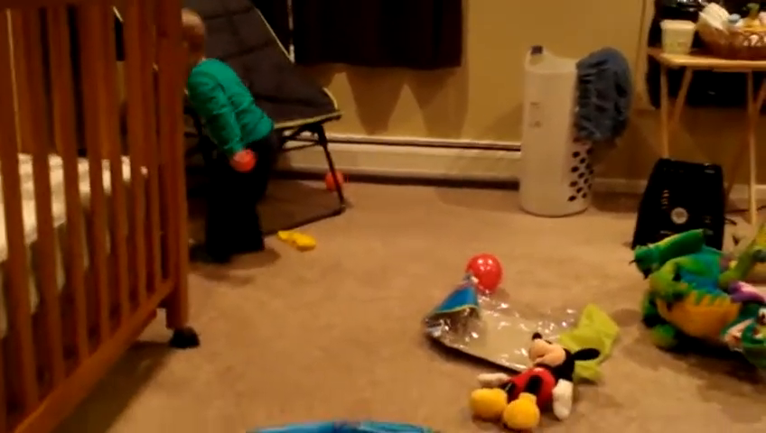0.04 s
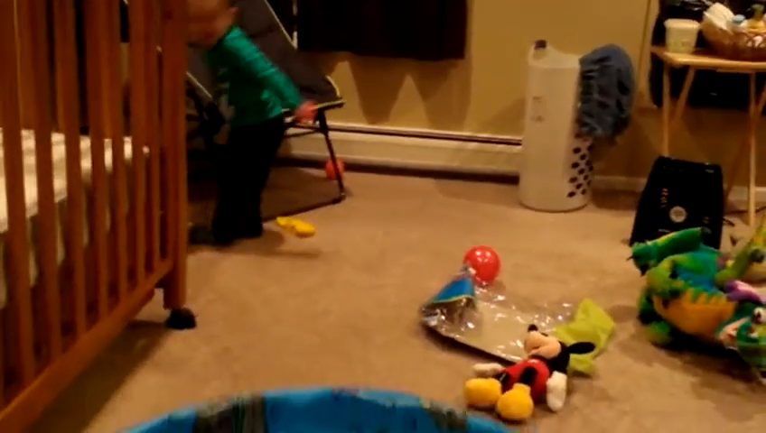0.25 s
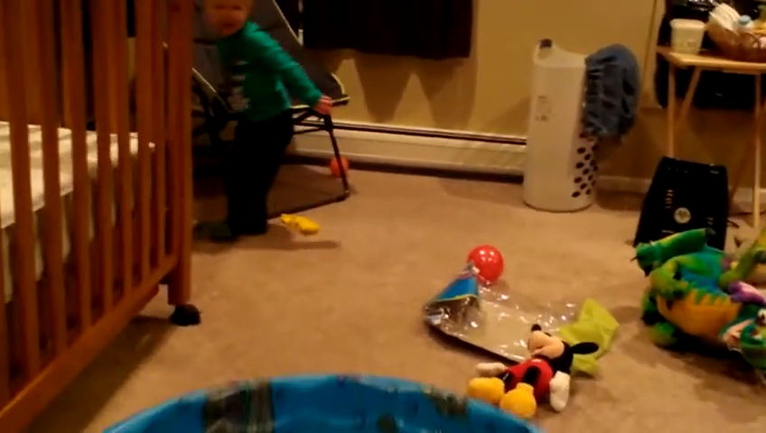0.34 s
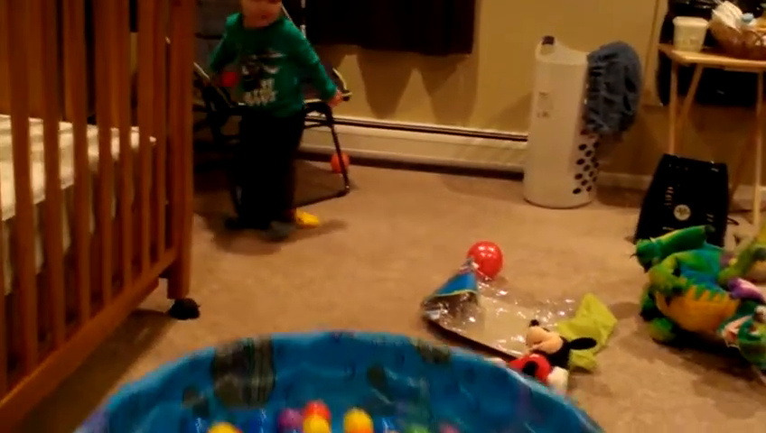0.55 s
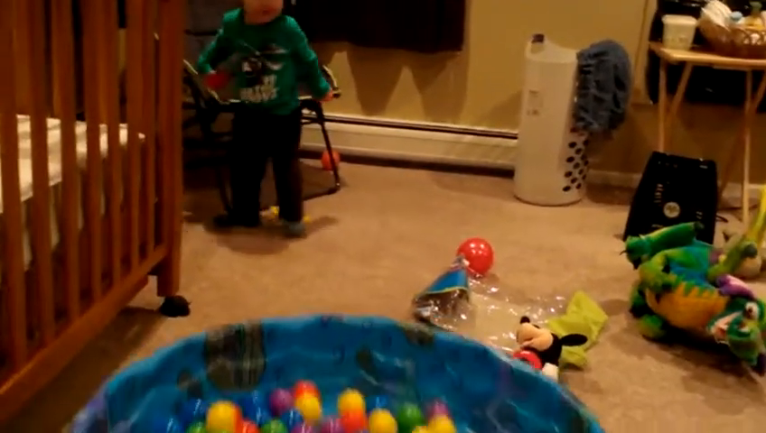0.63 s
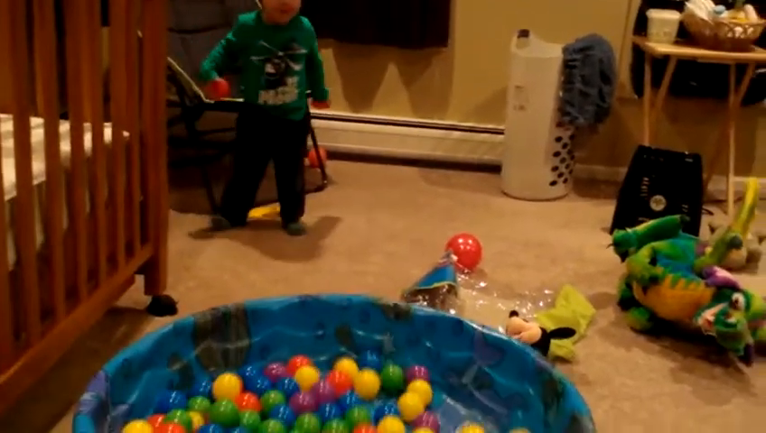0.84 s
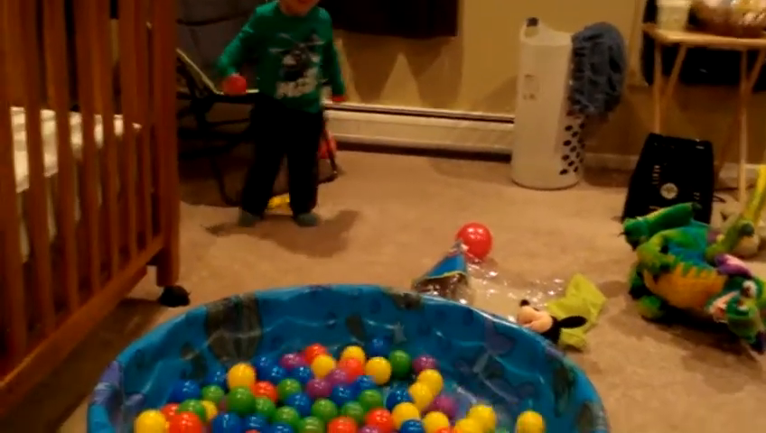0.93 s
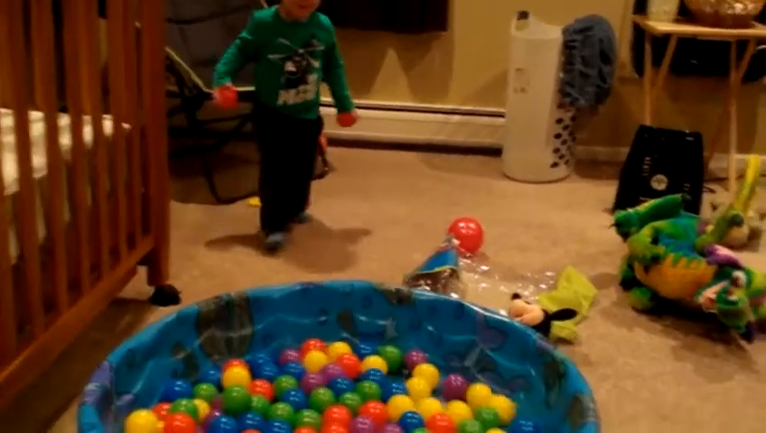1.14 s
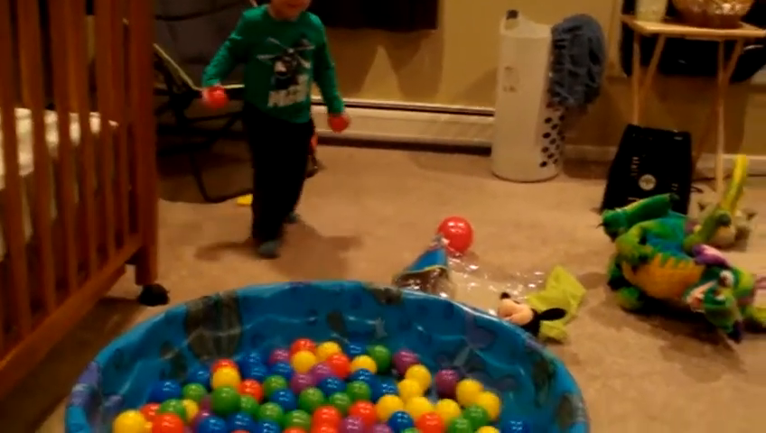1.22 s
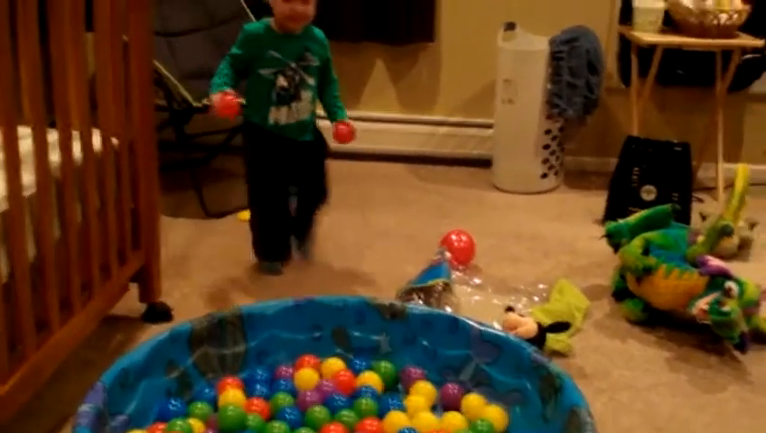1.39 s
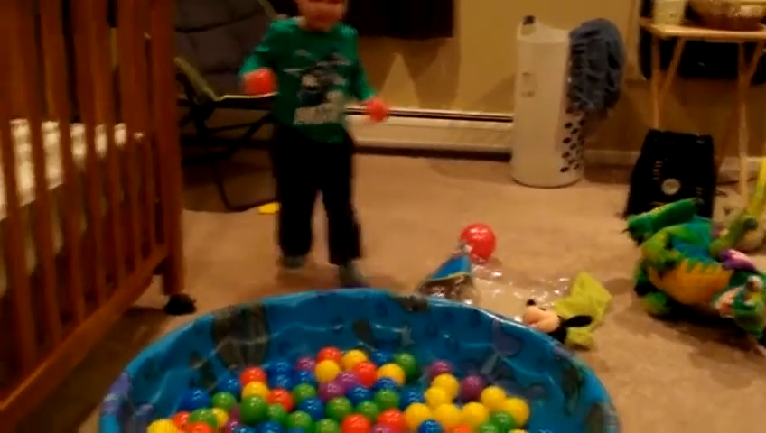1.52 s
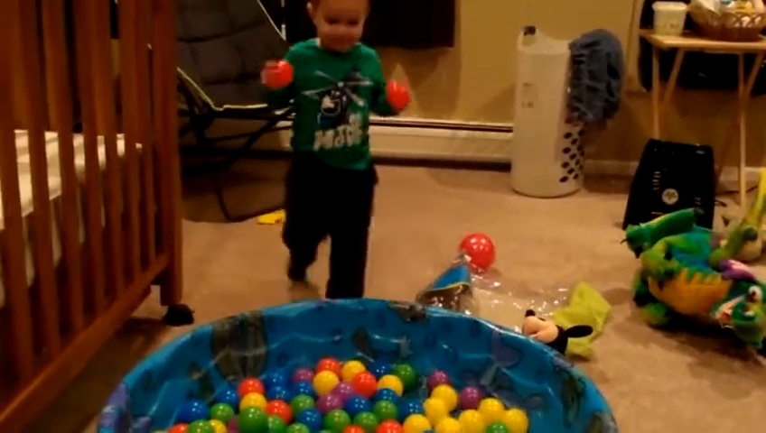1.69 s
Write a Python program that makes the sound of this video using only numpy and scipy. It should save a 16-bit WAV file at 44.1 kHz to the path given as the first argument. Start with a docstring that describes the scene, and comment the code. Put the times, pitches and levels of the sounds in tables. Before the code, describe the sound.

Close by in a small carpeted room, plastic play balls are stirred twice, clattering together and drumming dully on a plastic pool. The last balls click to rest, and faint footsteps follow over low room tone.

```python
"""Hollow plastic play balls stirred in a thin plastic pool: two surges, then a few stragglers settle.
The balls bump the pool, which drums on its low modes; they clack on each other, and their skins
scuff in a fine hiss. The place is a small carpeted room, with room tone, an uneven low rumble and
soft footfalls near the end. The stereo microphone is close enough for direct sound to lead the room."""
import sys
import numpy as np
from scipy import signal
from scipy.fft import rfft, irfft, next_fast_len
from scipy.io import wavfile

SR = 44100
rng = np.random.default_rng(int(sys.argv[2]) if len(sys.argv) > 2 else 0)


def digitize_waveform(pressure):
    """Quantize a signal to 16-bit integers and store it at the path in sys.argv[1].

    Rows of a 2-D input are taken as channels; values are limited to [-1, 1].
    """
    field = np.atleast_2d(pressure).T
    bounded = np.clip(field, -1, 1)
    quanta = np.round(bounded * 32767).astype(np.int16)
    wavfile.write(sys.argv[1], SR, quanta)


N = 77175

# How hard the heap moves. Each row: time in seconds, drumming of the pool in dB, clacking and
# scuffing in dB against the drumming (before their trims), pitch the pool favours in Hz.
STIRRING = [(0.205, -36, -18, -37, 276), (0.213, -43, -14, -19, 289), (0.243, -40, -3.5, -4.5, 251),
            (0.285, -33, -3.5, -13.5, 261), (0.303, -39, -4.5, -8.5, 282), (0.351, -31, -2.5, -14.5, 342),
            (0.419, -31, -10.5, -17, 262), (0.487, -35.5, -6.5, -14, 300), (0.535, -38.5, -2.5, -7, 270),
            (0.599, -36.5, -9, -10.5, 323), (0.621, -36.5, -5, -7.5, 298), (0.665, -39, -6.5, -8.5, 240),
            (0.745, -43, -8, -3.5, 280), (0.849, -36.5, -4, -12, 300), (0.871, -35.5, -3, -13, 277),
            (0.939, -34, -3, -18, 268), (0.975, -33.5, -1, -18.5, 295), (1.009, -31, -8.5, -22, 249),
            (1.035, -31, -8.5, -25, 230), (1.073, -37.5, -2.5, -18, 257), (1.095, -37.5, -5, -22.5, 308),
            (1.171, -43, 0, -12, 292), (1.207, -38, -4, -19.5, 302), (1.276, -44.5, -2, -11, 238),
            (1.281, -32, -8, -22, 217), (1.33, -43.5, 1.5, -16.5, 210), (1.369, -40, -7, -23.5, 206),
            (1.413, -47.5, -6.5, -31, 178), (1.447, -53.5, -5, -17, 190), (1.511, -51.5, -20, -24, 240),
            (1.515, -58.5, 5, -7, 264), (1.582, -49, -17, -36, 268), (1.586, -48, -1.5, -14, 273),
            (1.661, -56, -13, -33, 193), (1.679, -57, -33, -29, 191), (1.75, -54, -17, -17, 266)]
# Heavy bumps on the pool. Each row: start in seconds, strength in dB, pitch the spot favours in Hz.
HEAVY_BUMPS = [(0.2061, -32.5, 300), (0.282, -24, 360), (0.343, -26, 320), (0.388, -31, 272),
               (0.423, -35, 177), (0.452, -22, 454), (0.494, -21.5, 357), (0.616, -32, 206),
               (0.857, -19, 285), (0.884, -23.5, 282), (0.964, -13.5, 284), (1.017, -14.5, 152),
               (1.044, -21.5, 163), (1.181, -23.5, 338), (1.276, -18.5, 164), (1.307, -19.5, 152.2),
               (1.345, -28.5, 152), (1.38, -28.5, 150), (1.481, -28, 183), (1.516, -31.5, 285),
               (1.548, -32, 277), (1.628, -35, 306), (1.658, -31.5, 179)]
# Clear clacks of ball on ball. Each row: start in seconds, strength in dB, pitch in Hz,
# crack against ring in dB.
CLEAR_CLACKS = [(0.2607, -33, 1860, -3), (0.278, -33, 2070, -11), (0.3501, -30, 1460, -8),
                (0.4074, -36, 1940, 4), (0.8855, -32, 1880, -14), (0.9098, -37.5, 2170, -9),
                (1.0284, -34, 1350, 0), (1.1934, -34.5, 1740, -13), (1.2787, -33, 2900, 3),
                (1.2808, -32, 2300, -5), (1.2924, -35, 2160, -14), (1.3097, -33, 1950, -8),
                (1.328, -32, 2420, -16), (1.3642, -33, 2280, -18), (1.3928, -40, 2050, -14),
                (1.514, -52, 2810, -6), (1.5848, -49, 2090, -4), (1.602, -51, 1460, -9),
                (1.711, -55, 2900, -5)]
# Modes of the pool. Each row: frequency in Hz, relative level in dB, seconds to die by 60 dB.
POOL_MODES = [(152.4, -6.5, 0.28), (190, -5, 0.12), (224.5, -11.5, 0.22), (285, 3, 0.072),
              (327.3, -10, 0.26), (368.7, 2.5, 0.055), (427, -3.5, 0.077), (437, -7.5, 0.18),
              (472.7, -5, 0.15), (521, -12, 0.45), (690, -0.5, 0.093), (781, -7, 0.072),
              (1017, -2.5, 0.053)]
# Colour of the clacking heap. Each row: pitch of a ball in Hz, weight in dB.
HEAP_COLOUR = [(350, -34), (600, -4), (944, -1), (1030, -3.5), (1170, -6.5), (1600, -9.5), (2140, -6),
               (4000, -22.5), (6000, -29.5), (7800, -55), (13200, -120)]
# Colour of the scuffing skins. Each row: frequency in Hz, relative level in dB.
SCUFF_COLOUR = [(1470, -0.5), (2500, -0.5), (4530, -7.5), (5590, -5), (6380, -5.5), (9150, -3),
                (10100, -4.5), (10500, -15), (13600, -64), (22000, -120)]
# Colour of the room tone. Each row: frequency in Hz, relative level in dB.
ROOM_TONE_COLOUR = [(12, -52), (20, 13), (44, -48), (69, 1.5), (123, -3.5), (140, -0.5), (646, -13),
                    (1850, -15.5), (2820, -18.5), (6050, -21.5), (10800, -25), (14000, -83), (22000, -120)]
# Low rumble that comes and goes. Each row: time in seconds, level in dB.
RUMBLE_LEVEL = [(0.0, -90), (0.302, -74), (0.33, -52), (0.658, -76), (0.872, -58), (0.934, -83),
                (0.988, -49.5), (1.174, -79), (1.402, -61), (1.612, -98), (1.696, -52), (1.75, -58)]
# Footfalls on the carpet. Each row: time in seconds, peak in dB, width in seconds.
STEPS = [(1.663, -41, 0.0013), (1.698, -40.5, 0.0022), (1.736, -53, 0.0024)]
# Diffuse sound at the microphone's two ports. Each row: frequency in Hz, likeness from 0 to 1.
PORT_LIKENESS = [(60, .85), (130, .95), (260, .98), (400, .95), (600, .75), (1140, .36), (2200, .03),
                 (3000, 0)]
# Colour difference between the ports. Each row: frequency in Hz, left minus right in dB.
PORT_BALANCE = [(100, 2.5), (330, -0.8), (600, 1), (1100, -1.5), (2000, -2.3), (4000, 4), (6000, 1.9),
                (8500, -7.5), (10400, -4)]

RING_CYCLES = 22   # a ball's shell dies by 60 dB in this many cycles
TIME = np.arange(N) / SR


def amp(db):
    """dB to gain."""
    return 10 ** (np.asarray(db) / 20)


def unit_rms(x):
    """Scale to rms 1."""
    return x / np.sqrt(np.mean(x ** 2) + 1e-20)


def curves(rows):
    """Columns of a timed table, per sample."""
    times, *columns = np.transpose(rows)
    return [np.interp(TIME, times, column) for column in columns]


def at_hz(points, hz):
    """A spectrum read on a log-frequency axis."""
    freqs, values = np.transpose(points)
    return np.interp(np.log(np.maximum(hz, 1)), np.log(np.maximum(freqs, 1)), values)


def colour(x, gain_of_hz):
    """Filter by a gain per frequency."""
    n = next_fast_len(N + SR // 2)
    return irfft(rfft(x, n) * gain_of_hz(np.arange(n // 2 + 1) * SR / n), n)[..., :N]


def contacts(per_s, spread_db):
    """Two unrelated streams of random clicks, mostly small, a few large."""
    size = amp(spread_db * np.minimum(rng.exponential(1, (2, N)), 4))
    return size * rng.choice([-1, 1], (2, N)) * (rng.random((2, N)) < per_s / SR)


def ring(clicks, hz, t60):
    """A unit click sets a sine of height 1 ringing."""
    r, w = amp(-60 / (t60 * SR)), 2 * np.pi * hz / SR
    return signal.lfilter([0, np.sin(w)], [1, -2 * r * np.cos(w), r * r], clicks + 1e-18)


def diffuse(pair):
    """Sound from all around reaches the two ports alike in the bass, unlike in the treble."""
    mid = colour(pair[0], lambda hz: np.sqrt((1 + at_hz(PORT_LIKENESS, hz)) / 2))
    side = colour(pair[1], lambda hz: np.sqrt((1 - at_hz(PORT_LIKENESS, hz)) / 2))
    return np.array([mid + side, mid - side])


def background(tone_db=-57):
    """Steady room tone and an uneven rumble, all around the microphone."""
    tone = colour(rng.standard_normal((2, N)), lambda hz: amp(at_hz(ROOM_TONE_COLOUR, hz)))
    low_band = signal.butter(2, [22, 70], "band", fs=SR, output="sos")
    rumble = signal.sosfilt(low_band, rng.standard_normal((2, N)))
    rumble_db, = curves(RUMBLE_LEVEL)
    return amp(tone_db) * unit_rms(diffuse(tone)) + amp(rumble_db) * unit_rms(diffuse(rumble))


def room(x, t60=0.22, build_s=0.0085):
    """Dense reflections build up and die quickly in the small carpeted room."""
    tail = diffuse(rng.standard_normal((2, N))) * amp(-60 * TIME / t60) * np.clip(TIME / build_s, 0, 1)
    tail = tail[:, :SR // 2] / np.sqrt(np.sum(tail ** 2) / 2)
    return signal.fftconvolve(x[None], tail, axes=1)[:, :N]


def footfalls():
    """Each soft step on the carpet reaches the microphone as one smooth dip of pressure."""
    return sum(-amp(db) * np.exp(-((TIME - s) / width) ** 2) for s, db, width in STEPS)


def scuffing(scuff_db, trim_db=4.5):
    """Very fine ticks of skin on skin, from all over the heap."""
    ticks = colour(contacts(per_s=9900, spread_db=2.5), lambda hz: amp(at_hz(SCUFF_COLOUR, hz)))
    return amp(scuff_db + trim_db) * unit_rms(diffuse(ticks))


def heap_clatter(level):
    """Dense contacts all over the heap, each dealt to a ball that rings at its own pitch."""
    pitches = np.geomspace(600, 6000, 40)
    dealt = rng.integers(0, len(pitches), (2, N))
    touches = contacts(per_s=8000, spread_db=2)
    shells = sum(amp(at_hz(HEAP_COLOUR, hz)) * hz * ring(touches * (dealt == k), hz, RING_CYCLES / hz)
                 for k, hz in enumerate(pitches))
    low_cut = signal.butter(2, 500, "high", fs=SR, output="sos")
    return level * unit_rms(signal.sosfilt(low_cut, shells))


def ball_clacks(upper_ratio=1.27, upper_db=-11, rise_s=0.0004, crack_t60=0.005, trim_db=-1):
    """Ball hits ball: a short, dulled crack, and the hollow shell rings on two modes."""
    out, t = np.zeros(N), TIME[:SR // 20]
    white = 2 * rng.standard_normal((len(CLEAR_CLACKS), len(t)))
    dulled = signal.lfilter(*signal.butter(2, 3600, fs=SR), white)
    for (start, db, hz, crack_db), noise in zip(CLEAR_CLACKS, dulled):
        shell = np.sin(2 * np.pi * hz * t) + amp(upper_db) * np.sin(2 * np.pi * hz * upper_ratio * t)
        envelope = (1 - np.exp(-t / rise_s)) * amp(-60 * t * hz / RING_CYCLES)
        crack = amp(crack_db - 60 * t / crack_t60) * noise
        i = int(start * SR)
        out[i:i + len(t)] += amp(db + trim_db) * (shell * envelope + crack)[:N - i]
    return out


def favour(hz, favoured_hz, db_per_octave):
    """Gain in dB of a mode: the further from the favoured pitch, the weaker."""
    return -db_per_octave * np.abs(np.log2(hz / favoured_hz))


def pool_wall(x, rise_s=0.00023, radiates_from_hz=131):
    """Soft contact rounds off the treble, and the thin wall radiates little deep bass."""
    soft = np.exp(-1 / (rise_s * SR))
    low_cut = signal.butter(6, radiates_from_hz, "high", fs=SR, output="sos")
    return signal.sosfilt(low_cut, signal.lfilter([1 - soft], [1, -soft], x))


def pool_drumming(drum_db, favoured_hz, swell_s=0.0063, bump_trim_db=-14.5):
    """Balls strike the pool's modes. Returns a shower of soft bumps and the single heavy ones."""
    starts, bump_db, spot_hz = np.transpose(HEAVY_BUMPS)
    scatter_db = rng.normal(0, 0.69, (len(starts), len(POOL_MODES)))
    touches = contacts(per_s=900, spread_db=2) * amp(drum_db)
    shower = bumps = 0
    for k, (hz, mode_db, t60) in enumerate(POOL_MODES):
        taps = touches * amp(mode_db + favour(hz, favoured_hz, db_per_octave=10.5))
        shower += ring(taps * rng.normal(1, 0.65, (2, N)), hz, t60)
        hit_db = bump_db + mode_db + scatter_db[:, k] + favour(hz, spot_hz, db_per_octave=23)
        hits = np.zeros(N)
        hits[(starts * SR).astype(int)] = amp(hit_db + bump_trim_db)
        # A brief push at the mode's own pitch makes a heavy bump swell in.
        push = ring(hits, hz, 3 * swell_s) * 7 / (swell_s * SR)
        bumps += (-1) ** k * ring(push, hz, t60)
    shower /= np.sqrt(np.mean((shower / amp(drum_db)) ** 2))
    return pool_wall(shower), pool_wall(bumps)


def scene(start_s=0.2036, rise_s=0.0067, heap_trim_db=-1, right_lag_samples=5):
    """The stirred pool as it reaches the microphone; heavy bumps and clear clacks wake the room."""
    drum_db, clatter_db, scuff_db, favoured_hz = curves(STIRRING)
    shower, bumps = pool_drumming(drum_db, favoured_hz)
    clacks = ball_clacks()
    reflections = room(amp(-10) * bumps + amp(-7) * clacks)
    moving = np.clip((TIME - start_s) / rise_s, 0, 1)
    settling = amp(-59.5 - 78 * TIME)   # the heap is still settling from an earlier nudge
    clatter = heap_clatter(moving * amp(drum_db + clatter_db + heap_trim_db) + settling)
    spread = diffuse(moving * shower + clatter) + moving * scuffing(drum_db + scuff_db)
    # Pool, heap and reflections reach the right port a little late.
    left, right = bumps + reflections + spread
    right = np.interp(np.arange(N) - right_lag_samples, np.arange(N), right)
    return np.array([left, right]) + clacks + footfalls() + background()


def record(dry, cutoff_hz=10650):
    """The stereo microphone: its two ports differ in colour, and the top is cut steeply."""
    ports = colour(dry, lambda hz: amp(at_hz(PORT_BALANCE, hz) * np.array([[.5], [-.5]])))
    return signal.sosfilt(signal.ellip(12, .5, 75, cutoff_hz, fs=SR, output="sos"), ports)


dry = scene()
out = record(dry)
digitize_waveform(out)
```